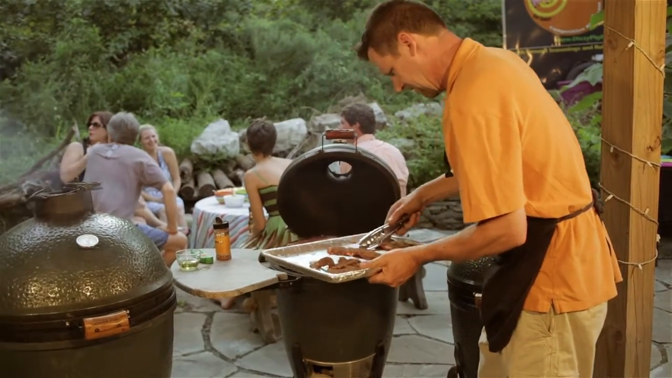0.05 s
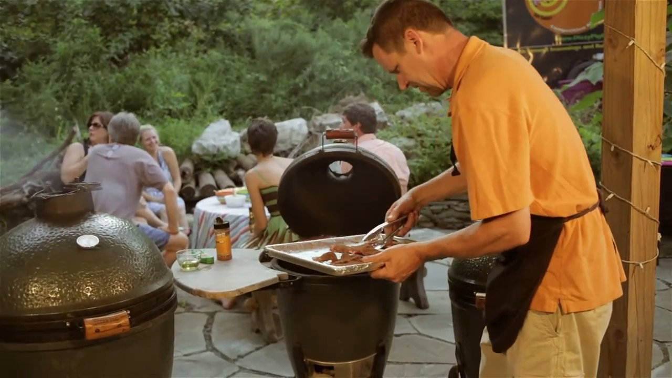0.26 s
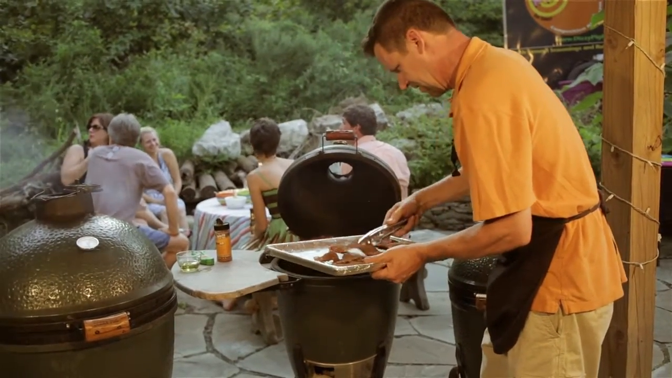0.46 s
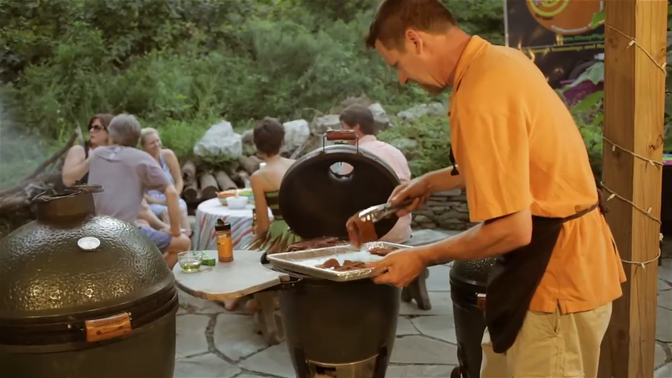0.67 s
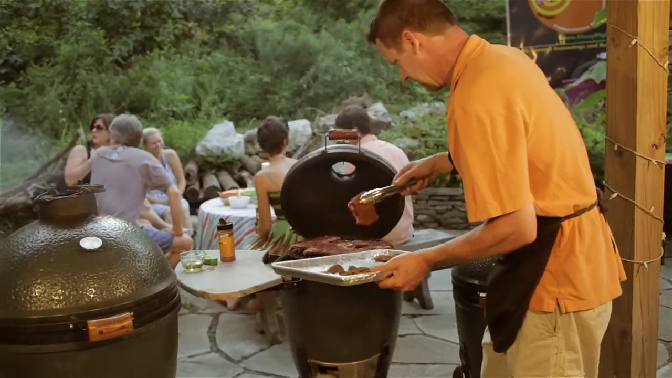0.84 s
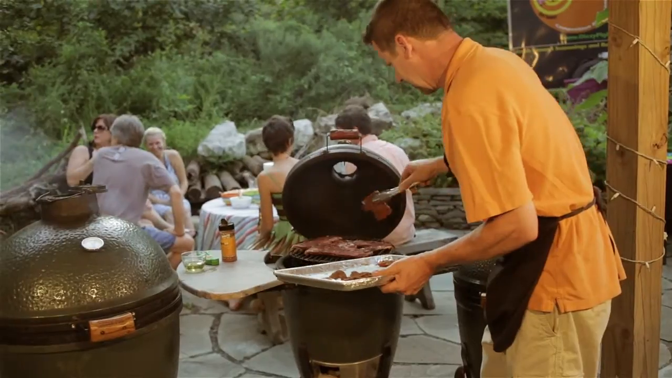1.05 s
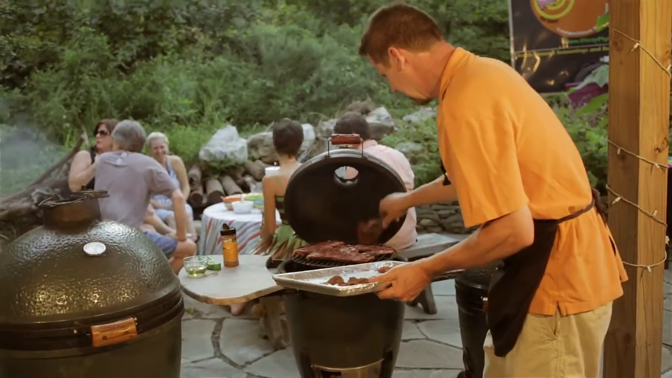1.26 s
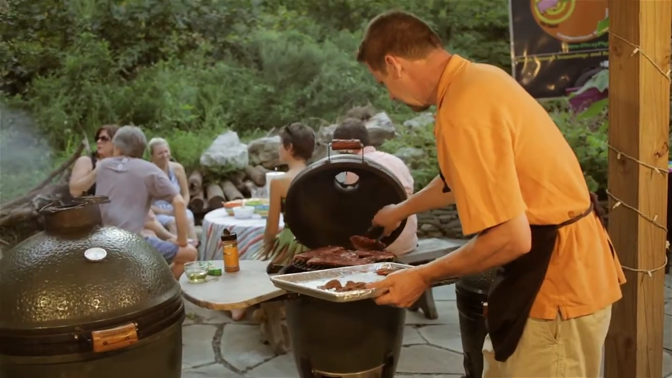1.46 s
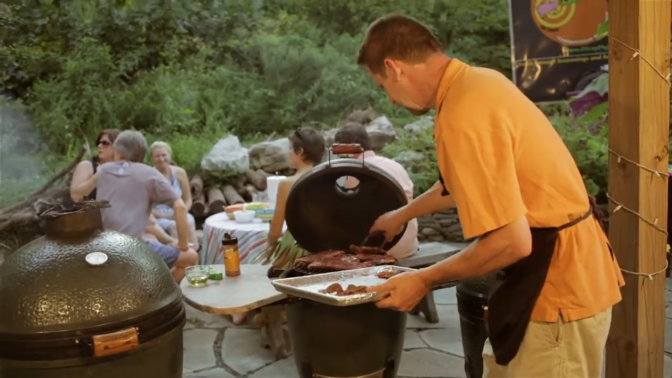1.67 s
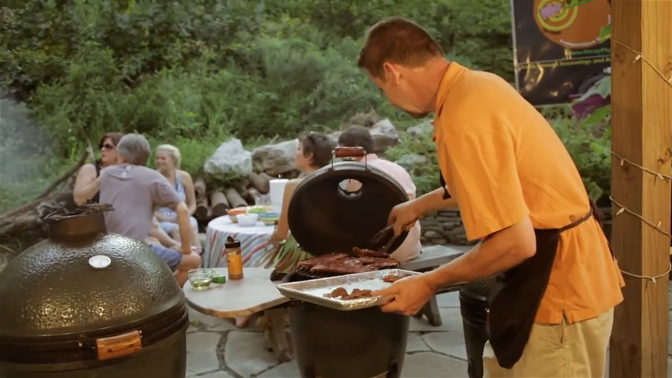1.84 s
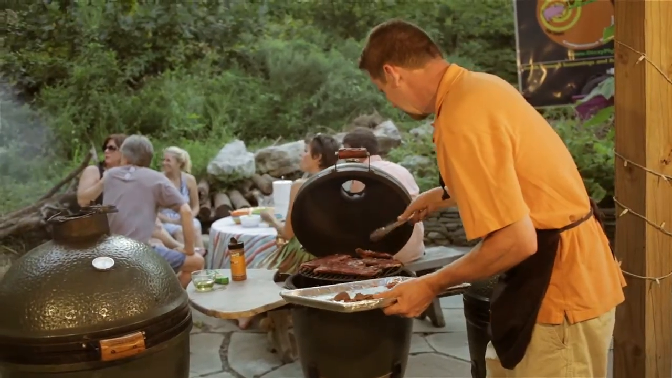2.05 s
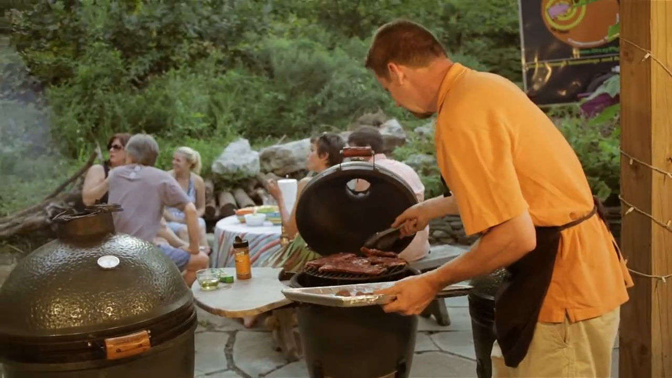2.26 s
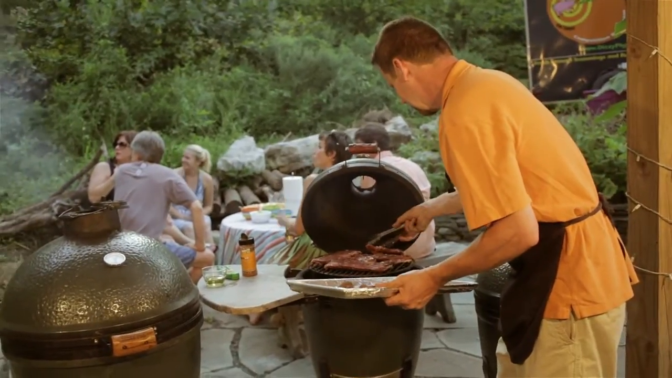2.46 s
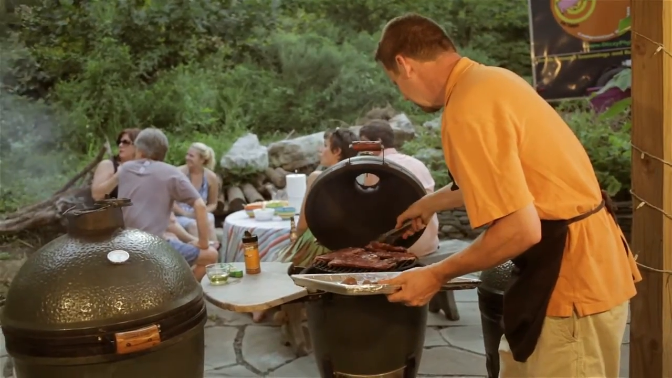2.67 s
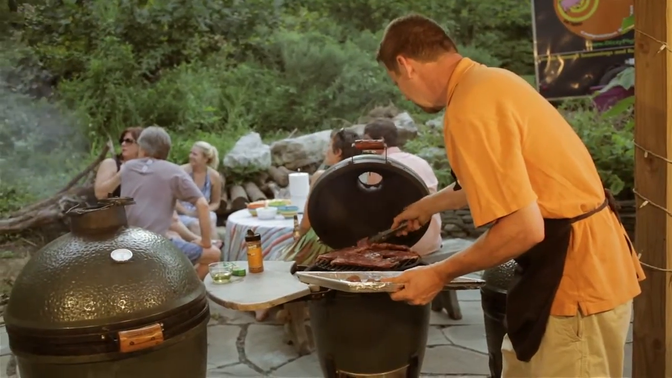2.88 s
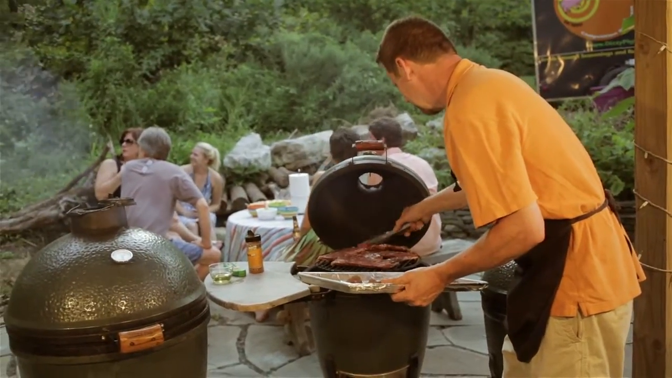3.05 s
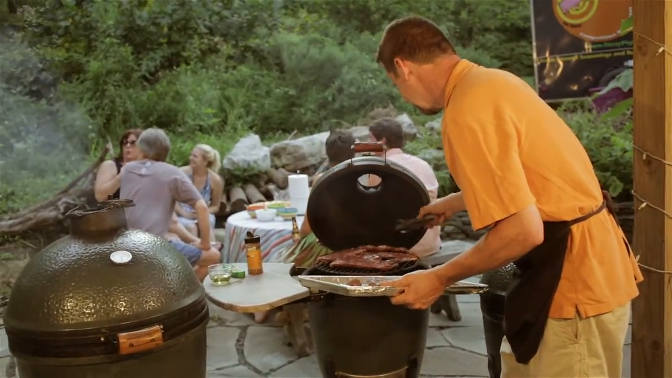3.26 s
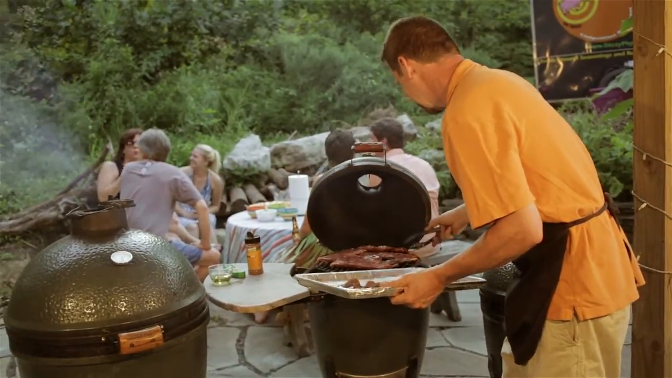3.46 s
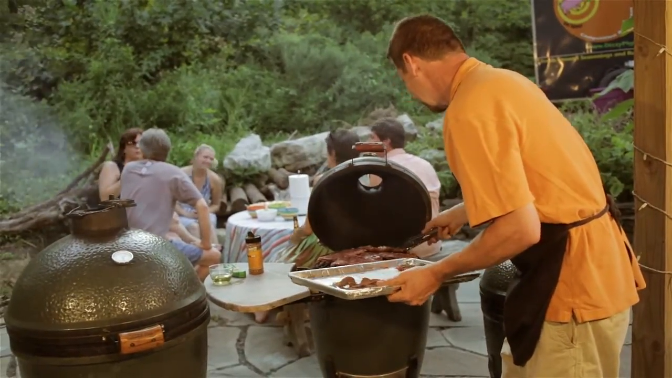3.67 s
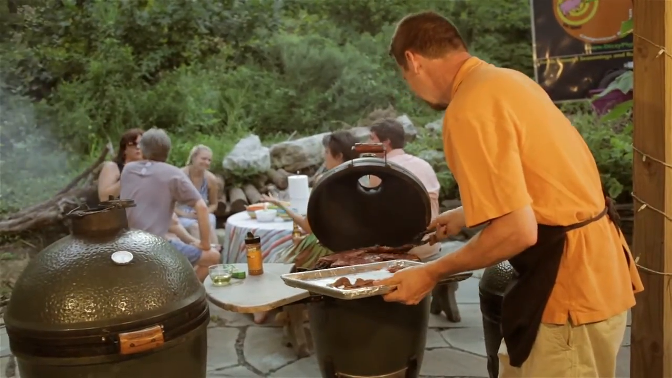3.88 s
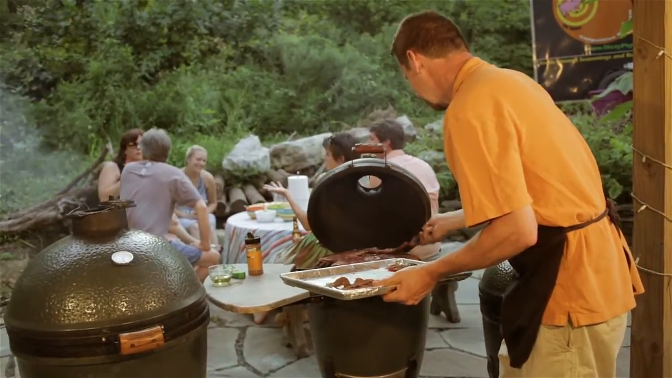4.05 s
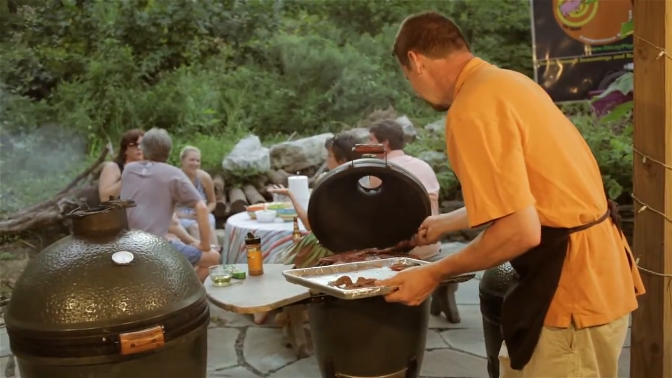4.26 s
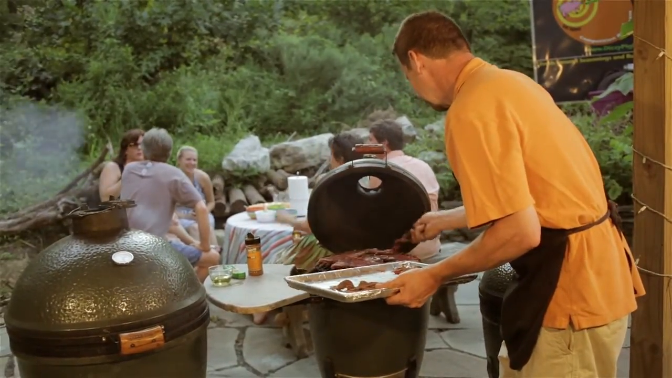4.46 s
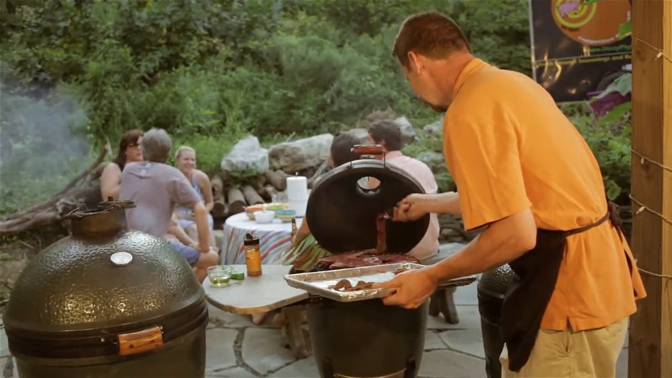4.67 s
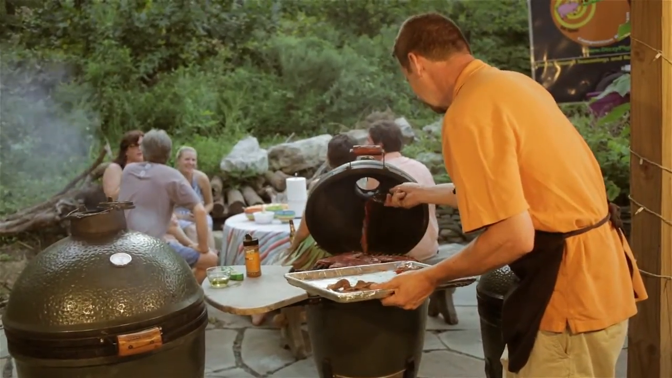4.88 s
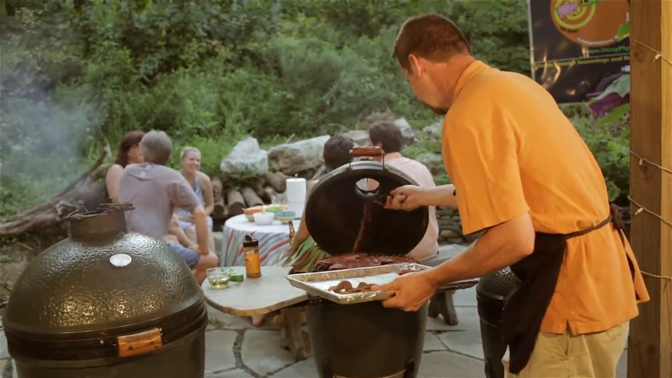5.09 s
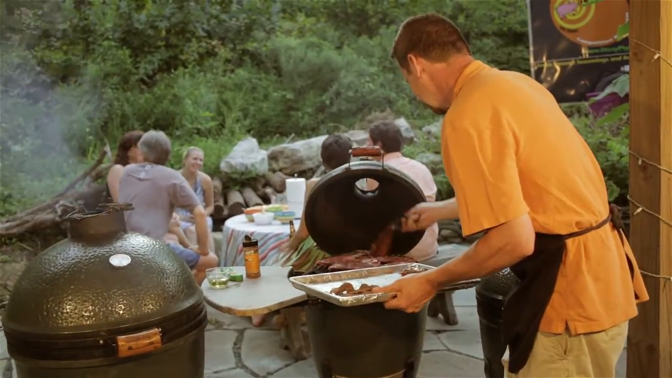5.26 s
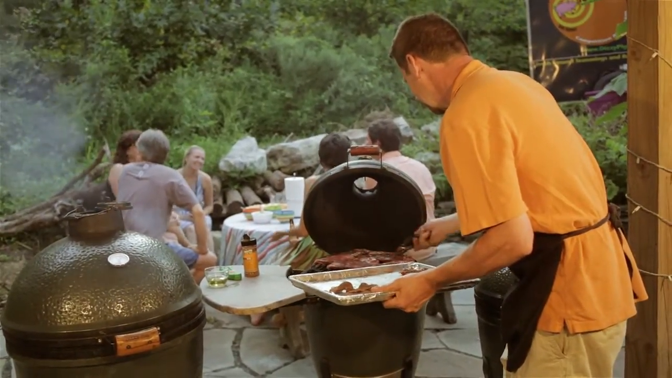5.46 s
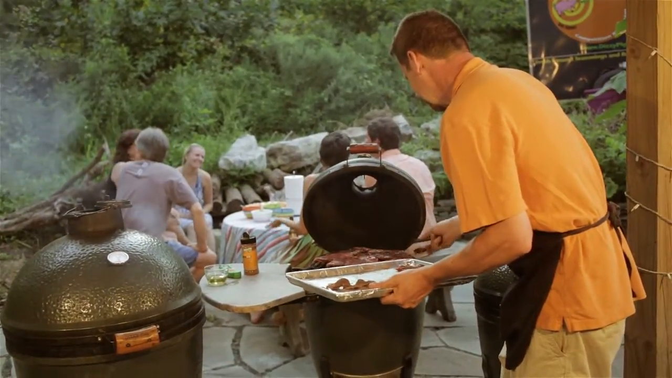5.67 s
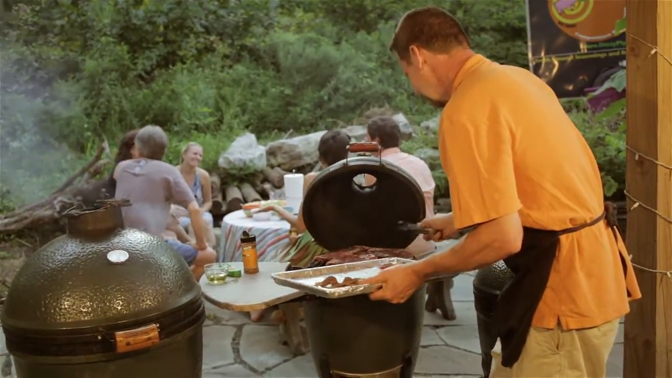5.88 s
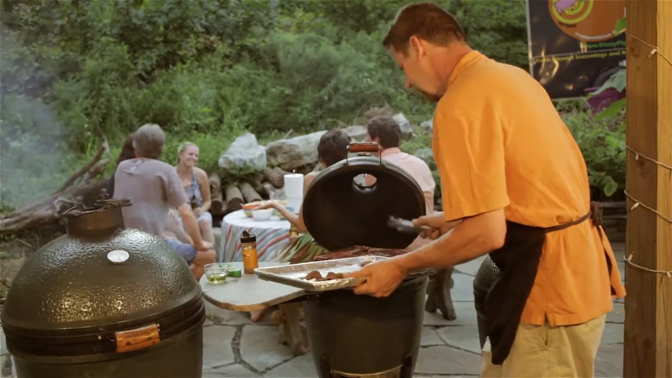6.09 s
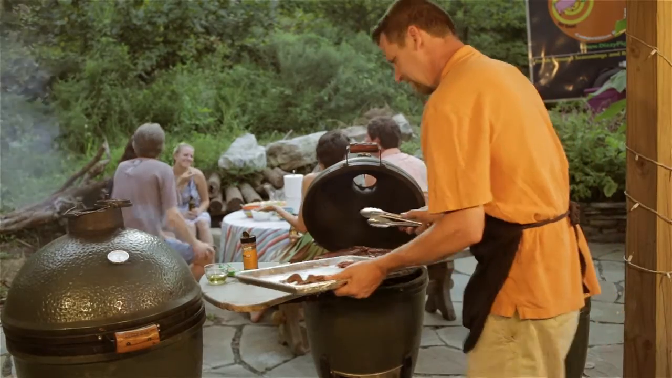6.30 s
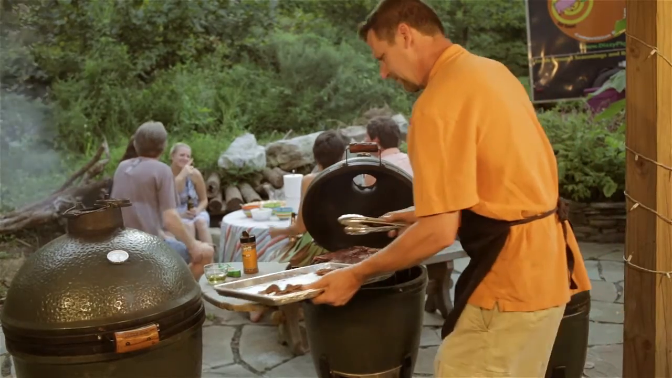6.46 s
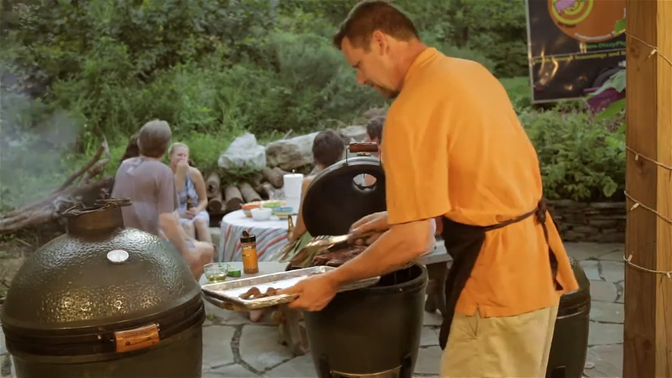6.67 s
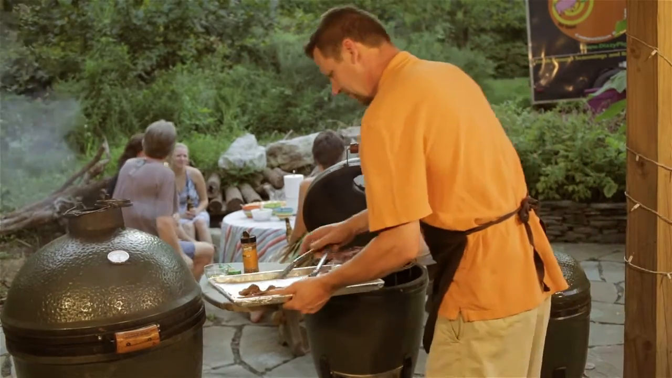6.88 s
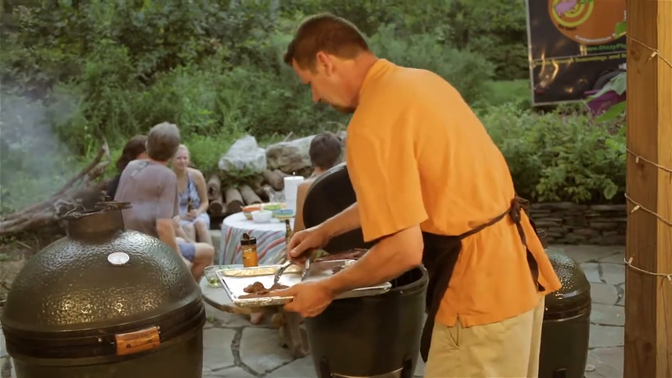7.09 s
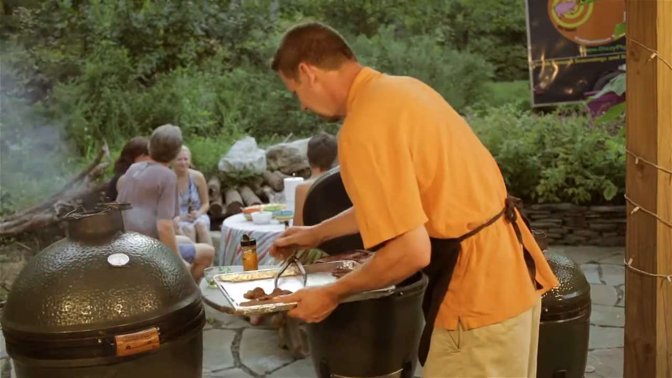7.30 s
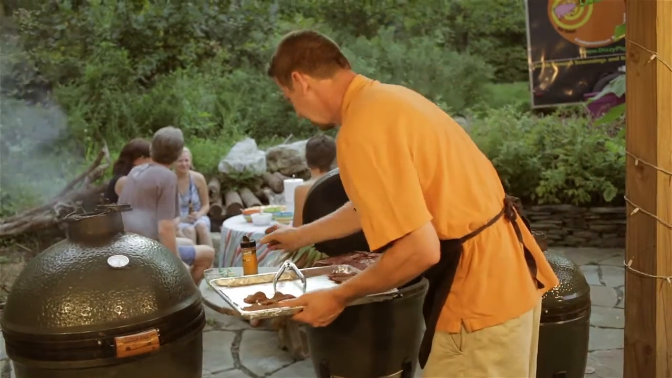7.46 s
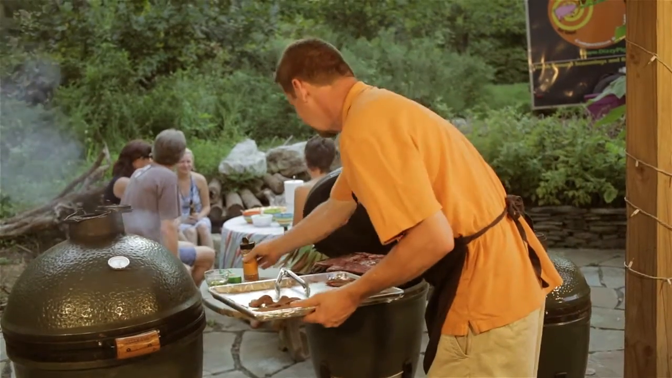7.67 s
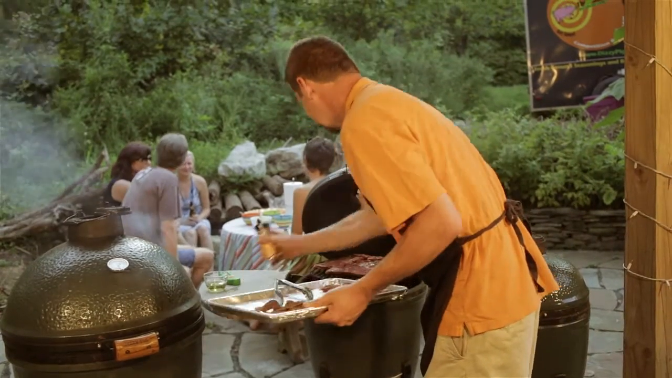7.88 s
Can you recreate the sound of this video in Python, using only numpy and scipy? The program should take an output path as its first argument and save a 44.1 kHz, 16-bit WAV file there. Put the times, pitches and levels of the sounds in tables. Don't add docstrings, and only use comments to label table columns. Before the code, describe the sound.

Steel tongs tick softly on grill bars amid faint frying and tray rubbing, before a sharp burst of bouncing knocks on a thin metal tray.

```python
import sys
import numpy as np
from scipy import signal
from scipy.fft import rfft, irfft, next_fast_len
from scipy.io import wavfile
from scipy.ndimage import uniform_filter1d

SR = 44100
rng = np.random.default_rng(int(sys.argv[2]) if len(sys.argv) > 2 else 0)


def generate_wav(signal):
    frames = np.transpose(np.atleast_2d(signal))
    scaled = np.clip(frames, -1, 1) * 32767
    pcm = np.round(scaled).astype(np.int16)
    wavfile.write(sys.argv[1], SR, pcm)


def nominal_scale(level):
    x = np.asarray(level, float) / 20
    return 10 ** x


N = 349933
TIME = np.arange(N) / SR
AFTER = np.arange(SR // 3) / SR


def unit(x):
    return x / np.sqrt(np.mean(x ** 2) + 1e-20)


def drift(rate_hz):
    r = np.exp(-2 * np.pi * rate_hz / SR)
    wander = signal.lfilter([1], [1, -2 * r, r * r], rng.standard_normal(N + SR))
    return unit(wander[SR:])


def resonance(x, hz, width_hz):
    r = np.exp(-np.pi * width_hz / SR)
    poles = [1, -2 * r * np.cos(2 * np.pi * hz / SR), r * r]
    return signal.lfilter([(1 - r * r) / 2, 0, (r * r - 1) / 2], poles, x)


def steep_band(x, hz, width_hz):
    return resonance(resonance(x, hz, width_hz), hz, width_hz)


def coloured(x, spectrum):
    hz, db = np.transpose(spectrum)
    size = next_fast_len(N)
    grid = np.maximum(np.arange(size // 2 + 1) * SR / size, 1)
    gain = nominal_scale(np.interp(np.log(grid), np.log(hz), db, -90, -90))
    return unit(irfft(rfft(x, size) * gain, size)[:N])


def sine(hz):
    return np.sin(2 * np.pi * hz * AFTER)


def dying(t60, rise_s=0.0001):
    return (1 - np.exp(-AFTER / rise_s)) * nominal_scale(-60 * AFTER / max(t60, .002))


def struck(modes, spread_db, rise_s=0.000087, free=1, centre_hz=5000, tilt_db=0):
    luck = nominal_scale(spread_db * rng.standard_normal(len(modes))) * rng.choice([-1, 1], len(modes))
    out = 0
    for strength, (hz, db, t60) in zip(luck, modes):
        favoured_db = db + tilt_db * abs(np.log2(hz / centre_hz))
        out = out + strength * nominal_scale(favoured_db) * dying(free * t60, rise_s) * sine(hz)
    return out


def crack(hz, width_hz, t60):
    burst = steep_band(rng.standard_normal(len(AFTER)), hz, 1.8 * width_hz)
    return unit(burst) * dying(t60) / 2


def add(out, s, sound):
    at = round(s * SR)
    out[at:at + len(sound)] += sound[:N - at]


def swells():
    # start_s, length_s, gain_db
    passing = [
        (0.093, 0.8, 1.5),
        (2.301, 0.49, 2),
        (4.396, 0.45, 2),
        (5.802, 0.52, 3),
        (7.402, 0.6, 2.5),
    ]
    return sum(db * np.sin(np.pi * np.clip((TIME - s) / length, 0, 1)) ** 2 for s, length, db in passing)


def garden():
    # pitch_hz, level_db (per Hz)
    spectrum = [(15, -57), (25, -16.5), (108, -4), (196, -13.5), (228, -10.5), (258, -10.5), (412, -15),
                (468, -10.5), (1030, -19), (1140, -20), (1270, -22.5), (1670, -24.5), (4000, -33),
                (5200, -28.5), (8800, -120)]
    level_db = -60 + swells() + .8 * drift(9)
    return nominal_scale(level_db) * coloured(rng.standard_normal(N), spectrum)


def insects():
    trill_hz = 40 * (1 + 0.077 * drift(1.28))
    throb_db = 1.5 * np.sin(2 * np.pi * np.cumsum(trill_hz) / SR) + .8 * drift(5.1) + 1.6 * drift(13)
    chorus = steep_band(rng.standard_normal(N), 7127, 480)
    return nominal_scale(-59 + throb_db) * unit(chorus)


def sizzle():
    # time_s, level_db
    frying = [(0, -57), (.4, -60), (.62, -59), (1.3, -58.5), (1.42, -53.5), (1.85, -57), (2.6, -57),
              (2.98, -53), (3.18, -57), (3.73, -58), (4.3, -61), (4.5, -59), (5.17, -61.5), (5.43, -57),
              (5.94, -59), (7.16, -59.5), (7.49, -62.5), (7.93, -63)]
    # pitch_hz, level_db (per Hz)
    fat_spectrum = [(6000, -13), (8200, -2.5), (11400, 1), (14500, 1.5), (15800, -1.5), (16000, -28)]
    # pitch_hz, level_db (per Hz)
    juice_spectrum = [(2500, -14), (4200, -11.5), (5200, -3), (6400, -2), (8500, -8), (12000, -26)]
    fat_db = np.interp(TIME, *np.transpose(frying))
    juice_db = -65 + 0.82 * (fat_db - fat_db.mean())
    flurry = drift(9)
    born = rng.random(N) < 5000 * nominal_scale(2.5 * flurry) / SR
    sizes = nominal_scale(2.3 * np.minimum(rng.exponential(1, N), 4.5)) * rng.choice([-1, 1], N)
    grains = unit(born * sizes) + 0.57 * rng.standard_normal(N)
    fat = nominal_scale(fat_db - 0.53 + .4 * flurry) * coloured(grains, fat_spectrum)
    juice = nominal_scale(juice_db + 1.2) * coloured(grains[::-1], juice_spectrum)
    return fat + juice


def spits():
    # start_s, peak_db, centre_hz, t60_s
    pops = [(.742, -42, 9000, .012), (2.053, -44.5, 3030, 0.024), (2.174, -38.5, 9000, 0.018),
            (2.652, -38, 9000, 0.012), (2.85, -39, 11000, 0.044), (3.025, -42, 11070, .05),
            (3.208, -40, 9000, .012), (3.898, -44, 9030, 0.011), (3.991, -50, 2980, .03),
            (4.227, -51, 1800, 0.017), (4.6, -46.5, 600, .04), (4.664, -43, 4990, 0.015),
            (4.702, -49, 4960, 0.013), (4.81, -43, 4500, 0.011), (5.001, -53, 7950, 0.013),
            (5.02, -54, 1000, .025), (5.055, -43, 3570, 0.017), (5.4832, -34, 8000, 0.01),
            (5.781, -43, 5000, 0.028), (5.8, -43, 8900, 0.013), (6.012, -27, 750, 0.013),
            (6.447, -53, 8030, 0.014), (6.521, -39, 8000, .012), (7.468, -44, 4000, 0.011),
            (7.627, -52, 8000, 0.011), (7.707, -41, 4060, 0.02), (7.9, -46, 5050, 0.011),
            (.112, -37.5, 600, 0.095), (7.043, -56, 1500, .03), (7.101, -43, 450, .03),
            (7.2695, -12.5, 1990, .03), (7.275, -29, 397, .08), (3.367, -51, 2790, .02)]
    out = np.zeros(N)
    for s, db, hz, t60 in pops:
        add(out, s, nominal_scale(db) * crack(hz, 1.56 * hz, t60))
    return out


def strokes():
    # start_s, length_s, hum_db, change_db (over the stroke), hum_hz
    rubs = [(.14, .27, -63, -0.5, 1755), (.37, .17, -62, -2.5, 1792), (.5, 0.196, -64, -2.5, 1726),
            (.66, 0.42, -65.5, -1.5, 1760), (1.1, 0.57, -71, -4, 1760), (1.63, .12, -64, -10, 1666),
            (2.41, 0.26, -71, -6, 1700), (2.64, 0.58, -72, -1, 1684), (3.24, 0.33, -75.5, -1, 1680),
            (3.71, 0.4, -77, 5.5, 1720), (4.25, 0.29, -69, -2, 1740), (4.55, 0.56, -67.5, -9.5, 1745),
            (5.6, 0.44, -78, 11, 1690), (6.02, 1, -65.5, -3, 1668), (7.33, 0.58, -64.5, -2.5, 1692)]
    grip_s, let_go_s, resting_db = 0.057, 0.023, -92
    pressure = nominal_scale(resting_db)
    knots_s, knots_hz = [], []
    for s, length, db, change_db, hz in rubs:
        shape = np.clip(np.minimum((TIME - s) / grip_s, (s + length - TIME) / let_go_s), 0, 1)
        trend_db = change_db * np.clip((TIME - s) / length, 0, 1)
        pressure = pressure + shape * nominal_scale(db + trend_db)
        knots_s += [s + grip_s, s + length - grip_s]
        knots_hz += [hz, hz]
    return 20 * np.log10(pressure), np.interp(TIME, knots_s, knots_hz)


def rubbing():
    # pitch_hz, width_hz, level_db
    bands = [(526, 148, 5.5), (805, 147, 4), (1194, 96, 1.5), (2100, 420, -2.5)]
    hum_db, hum_hz = strokes()
    rasp_db = -72 + 1.7 * (hum_db + 65)
    noise, grip = rng.standard_normal(N), drift(33)
    friction = noise * nominal_scale(0.35 * grip)
    body = sum(nominal_scale(db) * steep_band(friction, hz, 1.8 * width) for hz, width, db in bands)
    turns = 2 * np.pi * np.cumsum(hum_hz + 25 * grip) / SR
    hum = (.6 + 0.91 * drift(81)) * np.cos(turns) + 0.73 * drift(60) * np.sin(turns)
    rasp = unit(steep_band(friction, 3050, 380))
    flutter_db = 2.5 * unit(uniform_filter1d(grip, size=SR // 15))
    return nominal_scale(hum_db) * (nominal_scale(flutter_db) * hum + nominal_scale(3.5) * unit(body)) + nominal_scale(rasp_db) * rasp


def scrapes():
    # start_s, length_s, level_db, centre_hz, width_hz
    drags = [
        (0.152, 0.52, -61, 4960, 3980),
        (6.301, 0.17, -66.5, 2480, 2000),
        (6.59, 0.092, -57, 2890, 2470),
        (7.063, 0.045, -52, 7000, 6000),
        (7.182, 0.03, -53.5, 5900, 3000),
        (7.698, 0.075, -62.5, 2530, 3955),
        (.2, 0.27, -60, 330, 250),
        (0.201, 0.23, -69, 2600, 1500),
        (6.301, 0.13, -63.5, 850, 301),
        (7.3, 0.053, -53, 7000, 6000),
    ]
    out = np.zeros(N)
    for s, length, db, hz, width_hz in drags:
        count = round(length * SR)
        rough = rng.standard_normal(SR)[:count]
        stroke = signal.windows.tukey(count, .4)
        add(out, s, nominal_scale(db) * unit(resonance(rough, hz, width_hz)) * stroke)
    return out


def shelf_bump():
    # start_s, peak_db
    bump = (0.1096, -10.5)
    # pitch_hz, level_db, t60_s
    wood = [(471, 2, 0.036), (353, -36, 0.19), (636, 0, 0.0083), (2250, -1, 0.0043), (4340, -7, 0.0082),
            (5300, -15.5, 0.016)]
    out, (s, db) = np.zeros(N), bump
    knock = sum(nominal_scale(mode_db) * dying(t60, 0.0014) * sine(hz) for hz, mode_db, t60 in wood)
    add(out, s, nominal_scale(db) * (nominal_scale(-15) * crack(2200, 6800, 0.028) - knock))
    return out


def grate_taps():
    # start_s, tick_peak_db, tick_centre_hz, bars_db, bowl_boom_db
    taps = [
        (1.361, -72, 5030, -73, -62),
        (1.645, -43.5, 7000, -51, -38.5),
        (1.702, -52, 3000, -57, -43),
        (2.408, -45, 3000, -43, -44),
        (2.485, -52, 4000, -50, -42.5),
        (3.522, -47, 3600, -60, -47),
        (3.936, -63, 5000, -73, -44),
        (5.657, -38, 6000, -52, -55),
        (6.0112, -25, 6500, -38, -40),
        (7.722, -62, 3030, -52, -45),
    ]
    # pitch_hz, level_db, t60_s
    low_bars = [(634, 6, 0.037), (880, -1, 0.11), (1107, 3, 0.056), (1668, -6.5, 0.12), (2350, -19, 0.053)]
    # pitch_hz, level_db, t60_s
    high_bars = [(2656, -4.5, 0.038), (3140, 0, 0.033), (4490, 0, .04), (5470, 3, 0.05), (6300, 2, 0.042),
                 (6920, 3, 0.038), (8530, -5, 0.05), (5880, -3, 0.055), (13200, -4, .04)]
    out = np.zeros(N)
    for s, tick_db, tick_hz, bars_db, boom_db in taps:
        tick = crack(tick_hz, tick_hz, 0.058) + nominal_scale(-9) * struck(high_bars, 2.3, 0.00044)
        bars = crack(730, 1230, 0.098) + nominal_scale(-8) * struck(low_bars, 1.8, 0.00042)
        stand = nominal_scale(5.5) * crack(64, 200, 0.11)
        bowl = sine(287) * dying(0.1, 0.0016) + nominal_scale(-8) * sine(390) * dying(0.052, 0.00091)
        boom = bowl + nominal_scale(-5.5) * crack(188, 335, 0.2)
        add(out, s, nominal_scale(tick_db) * tick + nominal_scale(bars_db) * (bars + stand))
        add(out, s + .0095, nominal_scale(boom_db) * boom)
    return out


def tongs():
    # pitch_hz, level_db, t60_s
    arm = [(4210, 6, 0.028), (4500, 8, 0.038), (5400, 2.5, 0.095), (5200, 1.5, 0.16), (4960, 0, 0.072),
           (5650, 14, 0.026), (6120, 4, 0.064), (6470, -8, 0.15), (6680, 3, 0.068), (7900, -27, .15),
           (7800, -20, 0.079), (8560, -4, .13), (10000, -7, 0.1), (10700, -8, 0.1), (11590, -9, 0.1),
           (12300, -19, .15)]
    # start_s, level_db, free_share (of ring time), favoured_hz, tilt_db (per octave away)
    rings = [(1.541, -56, 0.18, 5290, -46), (2.372, -62, 0.36, 5520, -48), (2.41, -43, 0.13, 5200, -40),
             (2.4462, -59, 0.34, 5300, -60), (2.693, -56, 0.47, 5300, -60), (5.657, -49, 0.35, 5430, -13),
             (6.013, -37.5, 0.47, 5400, -24), (6.93, -35.5, 0.34, 5500, -4), (6.941, -53, 0.96, 5500, -2),
             (6.948, -43, 0.51, 9500, -20), (6.972, -37.5, 0.29, 5500, -5), (7.344, -56, 0.5, 5600, -20),
             (7.086, -48, 0.42, 10000, -12), (7.218, -63, .8, 5500, -14), (7.232, -63, 0.77, 5500, -16),
             (7.2608, -22.5, 0.21, 5200, -22), (7.269, -28.5, 0.23, 5250, 1.5),
             (7.2952, -39.5, 0.53, 5500, 5), (7.305, -43, 0.66, 5500, 6), (7.311, -44, 0.54, 5700, -19),
             (7.336, -48, .7, 11000, -9)]
    out = np.zeros(N)
    pair = arm + [(1.3 * hz, db - 11, t60) for hz, db, t60 in arm]
    for s, db, free, centre_hz, tilt_db in rings:
        add(out, s, nominal_scale(db) * struck(pair, 0.98, 0.00075, max(free, .05), centre_hz, tilt_db))
    return out * nominal_scale(3.1 * drift(150))


def clear_rings():
    # start_s, peak_db, pitch_hz, t60_s
    clear = [(0.113, -39.5, 133, 0.11), (.113, -38.5, 850, 0.064), (.113, -47, 1290, .05),
             (.217, -42, 324, .07), (6.012, -36, 15500, .05), (6.012, -42, 10400, 0.066),
             (6.012, -44, 8500, .06), (6.935, -32.5, 110, 0.18), (6.975, -37, 110, 0.14),
             (1.364, -42, 259, 0.059), (1.646, -56.5, 1655, 0.14), (1.66, -53, 880, .12),
             (1.69, -55, 287, 0.092), (2.4135, -47, 696, .05), (2.4133, -47, 1125, 0.074),
             (2.4135, -46, 2170, 0.048), (2.414, -50, 350, 0.14), (2.415, -60, 1370, 0.11),
             (2.445, -53, 5250, .06), (5.658, -44, 5470, .06), (5.658, -43, 6234, .05),
             (6.012, -41.5, 87, 0.08), (6.012, -46, 40, .2), (6.9305, -18.5, 710, 0.051),
             (6.9299, -21.5, 490, 0.085), (6.9305, -30, 1523, 0.047), (6.9305, -31, 2430, 0.036),
             (6.972, -42, 727, 0.11), (6.975, -34, 550, 0.08), (6.972, -27.5, 1520, 0.022),
             (6.99, -41, 712, 0.08), (7.0544, -27, 1680, 0.016), (7.0552, -31, 950, 0.015),
             (7.0779, -38, 1006, 0.043), (7.107, -29.5, 653, 0.024), (7.262, -24, 1300, .04),
             (7.269, -19, 1740, 0.033), (7.27, -26.5, 3320, .05), (7.269, -18, 547, 0.033),
             (7.2623, -9, 503, 0.03), (7.271, -25, 833, 0.056), (7.295, -23, 1820, 0.023),
             (7.296, -45, 3820, 0.18), (7.296, -29, 5160, 0.086), (7.308, -31, 5663, 0.088),
             (7.311, -37, 6600, 0.075), (7.325, -48, 6000, 0.091), (7.333, -44, 11590, .08),
             (2.416, -55, 1655, .2), (2.53, -60, 1712, 0.36), (5.668, -49.5, 230, .25),
            (5.658, -46, 5204, .06), (5.658, -49, 4600, .05), (6.0185, -34.5, 268, .12),
            (6.018, -39, 427, .08), (6.012, -31, 5470, .045), (6.012, -38, 7000, .05),
            (6.012, -42, 11000, .05), (6.012, -43, 14000, .06), (6.012, -41, 930, 0.054),
            (2.409, -48, 5250, .018), (2.69, -53, 5250, .07), (2.371, -56, 5400, .05),
            (6.9919, -29, 560, .025), (7.0028, -30, 620, .018), (7.0079, -31, 580, .025),
            (7.0712, -24, 560, .022), (7.074, -33, 450, .04), (7.099, -36, 480, .03),
            (7.09, -28, 500, .012), (7.2889, -21, 550, 0.017), (7.3, -24, 600, .03),
            (7.27, -25, 1890, 0.036), (7.27, -29, 3220, .035), (7.27, -31, 2430, .04),
            (7.2695, -24, 5210, .04), (7.298, -37, 5340, .08), (7.3, -39, 6610, 0.11),
            (7.3, -40, 8520, .11), (7.297, -28.5, 455, .1), (6.029, -45, 5500, .05), (6.02, -46, 7600, .05),
            (7.0664, -39, 6720, .055), (7.094, -44, 5300, .03), (7.079, -42, 4600, .03),
            (7.2608, -11, 4320, 0.013), (7.2705, -11.5, 520, .025), (6.947, -40, 5700, .03),
            (7.31, -46, 6830, .06)]
    out = np.zeros(N)
    for s, db, hz, t60 in clear:
        add(out, s, nominal_scale(db) * dying(t60, 0.00094) * sine(hz))
    return out


def bounces():
    # start_s, peak_db, centre_hz, t60_s
    touches = [(2.675, -49, 700, .04), (2.69, -52, 3000, .02), (5.4832, -37, 7000, .01),
               (5.9, -56, 1100, .08), (5.6573, -31, 5000, .008), (5.6575, -42, 2500, .015),
               (5.782, -45, 1995, .015), (5.803, -47, 1500, 0.033), (6.0125, -34, 12500, .02),
               (6.0147, -26, 5800, .012), (6.94, -36, 1500, .015), (6.95, -36, 1200, .015),
               (6.992, -35, 1200, .012), (7.002, -36, 900, .012), (7.0072, -38, 800, .015),
               (7.0718, -35, 1500, .012), (7.09, -36, 900, .012), (7.096, -46, 7000, .02),
               (7.1078, -38, 1100, 0.014), (7.2605, -18, 3000, .01), (7.2718, -15, 4000, .01),
               (7.2985, -24, 2000, .012), (7.313, -33, 5500, .03), (7.321, -38, 6000, .03),
               (7.341, -44, 5800, .05), (7.355, -46, 3000, .02), (2.4085, -45, 4000, .02),
               (2.485, -50, 4000, .015), (7.055, -36, 3500, .02), (7.0785, -38, 4500, .02),
               (7.304, -32, 5500, .03), (7.332, -42, 5800, .04)]
    out = np.zeros(N)
    for s, db, hz, t60 in touches:
        add(out, s, nominal_scale(db) * crack(hz, 1.07 * hz, t60))
    return out


def tray_knocks():
    # start_s, thud_peak_db, thud_hz, clank_db, snap_db
    knocks = [(.218, -43, 456, -63, -60), (6.724, -40.5, 455, -53, -65), (6.9302, -25, 702, -26.5, -22),
              (6.9359, -25, 492, -34, -42), (6.9719, -17, 556, -30.5, -29), (6.981, -35, 477, -37, -43),
              (6.991, -23, 543, -39, -43), (7.002, -31, 630, -56, -59), (7.007, -29, 554, -50, -55),
              (7.0546, -18, 480, -42, -36), (7.072, -51, 482, -41, -49), (7.0782, -20, 552, -36, -40),
              (7.089, -33, 496, -46, -46), (7.108, -42, 473, -49, -64), (7.2599, -22, 490, -18, -20.5),
              (7.2703, -7, 486, -24, -19), (7.288, -19, 543, -32, -39), (7.296, -18.5, 555, -20.5, -36),
              (7.312, -29, 493, -34, -26), (7.325, -36, 560, -56, -39), (7.351, -39.5, 485, -48, -56)]
    # pitch_hz, level_db, t60_s
    panel = [(114, -10, 0.11), (303, -15.5, 0.1), (455, -6, 0.065), (579, -7.5, 0.093), (749, -8, 0.065),
             (850, -8.5, 0.035), (1040, -15, 0.053), (1380, -13, 0.01)]
    # pitch_hz, level_db, t60_s
    rim = [(1760, 13, 0.0093), (1924, 1.5, 0.063), (2170, -15, 0.01), (2580, -24, 0.09), (2930, -33, 0.031),
           (3170, -9, 0.073)]
    pressed_t60, free_t60 = 0.013, 0.089
    out = np.zeros(N)
    for s, thud_db, hz, clank_db, snap_db in knocks:
        damping = np.exp((-18.5 - clank_db + thud_db) / 3)
        t60 = pressed_t60 + (free_t60 - pressed_t60) / (1.5 + damping)
        dent = -3 * sine(1.18 * hz) * dying(0.014, 0.0029)
        thud = -sine(hz) * dying(t60, 0.00072) + nominal_scale(-7) * struck(panel, 2.7, 0.00061)
        rattle = nominal_scale(-23.5) * crack(650, 470, 0.11) + nominal_scale(-13) * crack(170, 102, 0.16)
        clank = crack(1470, 1820, 0.036) + nominal_scale(-17.5) * struck(rim, 0.87)
        snap = crack(4600, 4100, 0.014) + nominal_scale(-10) * crack(4600, 7200, 0.11)
        low = nominal_scale(thud_db - 2.5) * (dent + thud + rattle)
        add(out, s, low + nominal_scale(clank_db) * clank + nominal_scale(snap_db) * snap)
    return signal.sosfilt(signal.butter(2, 87, "high", fs=SR, output="sos"), out)


def yard(x):
    echoes = [(.0043, -18), (.011, -18), (.023, -27), (.041, -25), (.067, -32)]   # delay_s, level_db
    dull = signal.lfilter([.5], [1, -.5], x)
    return sum(nominal_scale(db) * np.pad(dull, (round(s * SR), 0))[:N] for s, db in echoes)


def scene():
    steady = garden() + insects() + sizzle() + rubbing()
    contacts = spits() + scrapes() + bounces()
    blows = shelf_bump() + grate_taps() + tongs() + clear_rings() + tray_knocks()
    return (steady + contacts + blows + yard(blows))[None]


def band_limit(x):
    return signal.sosfilt(signal.butter(12, 16680, fs=SR, output="sos"), x)


def record(dry):
    top_cut = signal.cheby2(10, 40, 16750, fs=SR, output="sos")
    mix = signal.sosfilt(top_cut, dry)
    return band_limit(mix)


dry = scene()
out = record(dry)
generate_wav(out)
```